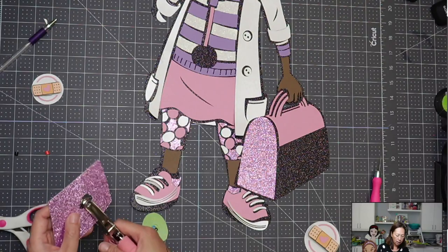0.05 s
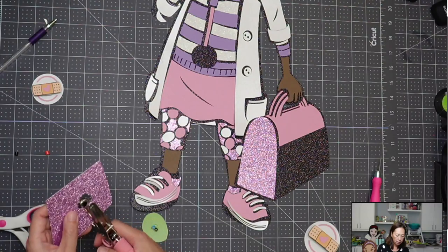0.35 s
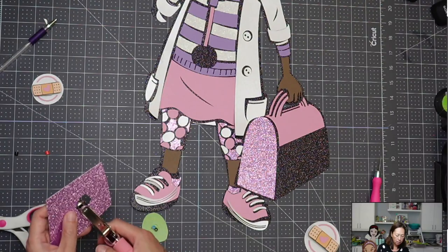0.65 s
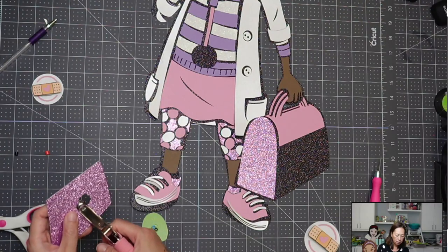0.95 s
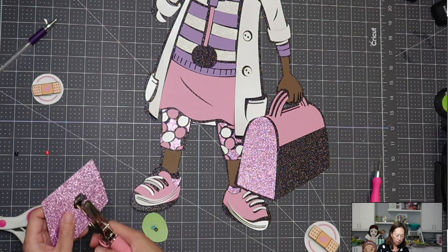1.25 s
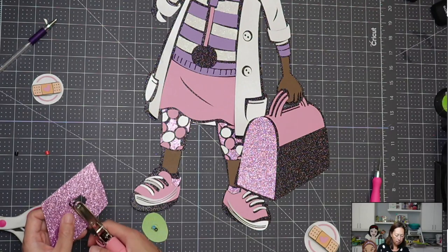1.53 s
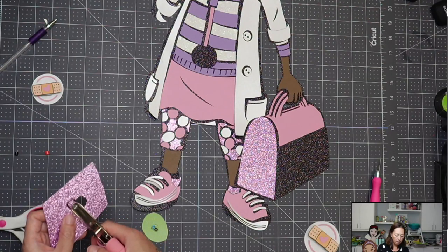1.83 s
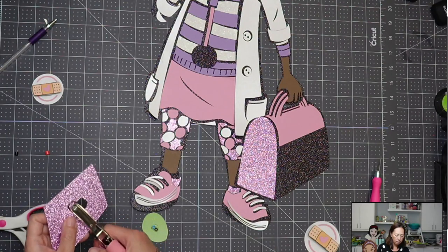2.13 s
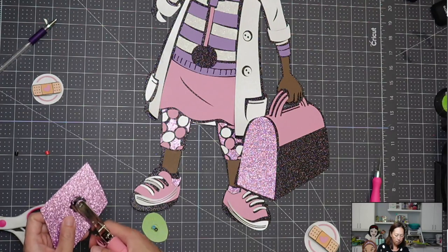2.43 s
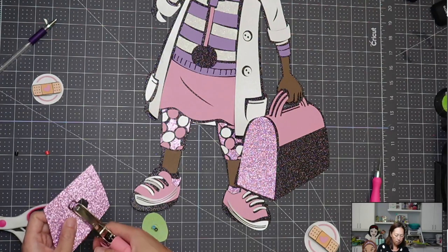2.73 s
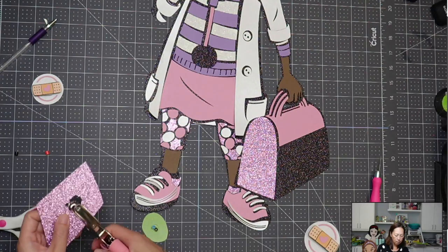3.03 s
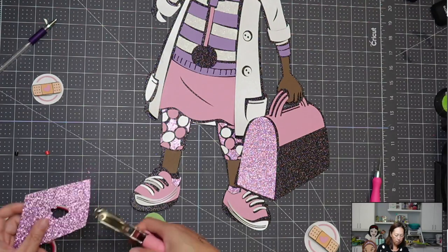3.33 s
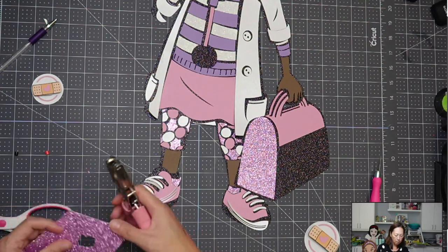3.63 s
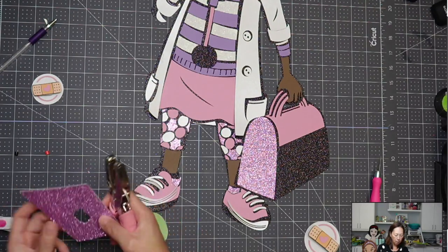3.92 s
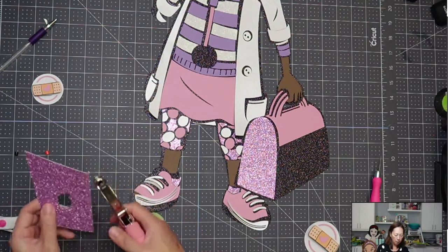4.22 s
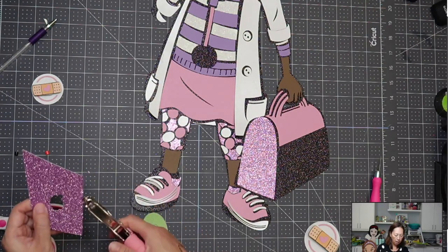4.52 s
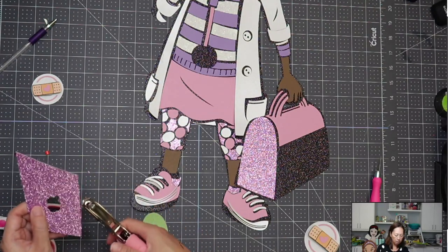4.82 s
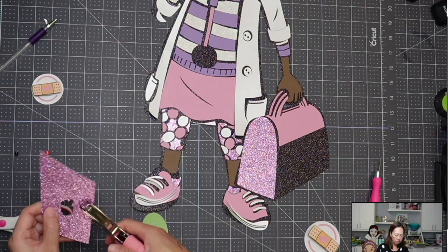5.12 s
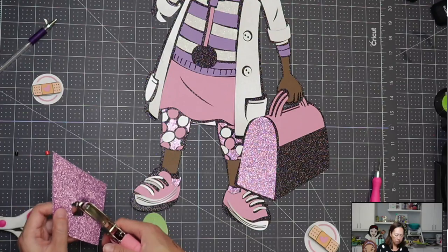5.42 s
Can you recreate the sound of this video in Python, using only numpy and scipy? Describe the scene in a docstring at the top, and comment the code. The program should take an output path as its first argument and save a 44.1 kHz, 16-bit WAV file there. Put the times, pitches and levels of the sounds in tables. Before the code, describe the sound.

In a small room with a faint fan hum, a plier-style hole punch bites through card with two loud metallic snaps that overload the close microphone, each followed by a springy clack. Quieter handling comes next: the card scrapes and creaks out of the jaws, fingers brush its glittery surface, the tool gives a lighter clack, and the card taps softly against the metal. Each click has a short echo.

```python
"""A computer fan hums in a small hard room, where a first snap is just dying away.
A plier-style hole punch snaps twice through glitter cardstock, overloading a close microphone;
after each snap the sprung handles clack open. Near 3 s the card is dragged out of the jaws,
scraping and creaking. Fingertips rub the glitter as it is turned, the punch clacks once more,
and the card ticks back in. The room answers every click."""
import sys
import numpy as np
from scipy import signal
from scipy.fft import rfft, irfft, next_fast_len
from scipy.io import wavfile
from scipy.ndimage import uniform_filter1d, map_coordinates

SR = 44100
rng = np.random.default_rng(int(sys.argv[2]) if len(sys.argv) > 2 else 0)


def dump_mix(stems):
    """Bounce the given channels to the path in sys.argv[1] as a 16-bit WAV at rate SR."""
    frames = np.atleast_2d(stems).T  # one column per channel
    limited = np.clip(frames, -1, 1)  # hard clip at full scale
    pcm = np.round(limited * 32767).astype(np.int16)
    wavfile.write(sys.argv[1], SR, pcm)


N = 249594
LEAD_SAMPLES = SR // 4  # before time zero

# Mains and fan lines. Each row: frequency in Hz, level in dB.
HUM_LINES = [(118.4, -54.5), (199.2, -64.5), (236.9, -65.5), (269.2, -67.5), (301.5, -66.5), (398.4, -68.5),
             (532.9, -74.5)]
# Table and wall echoes. Each row: delay in seconds, relative level in dB.
ECHOES = [(.0031, -11.5), (.0058, -13.5), (.0074, -18), (0.019, -16.5), (0.0196, -13.5), (0.028, -21),
          (0.0345, -19.5)]
# Room decay. Each row: frequency in Hz, t60 in seconds.
ROOM_DECAY = [(150, 0.12), (500, 0.32), (1200, 0.49), (3200, 0.44), (6500, 0.37), (10000, 0.5),
              (15000, 0.22)]

# Noise spectra. Each row: frequency in Hz, relative level in dB.
FAN_SPECTRUM = [(20, -3), (40, 0.5), (70, 7.5), (110, 3), (160, -1), (280, -8.5), (450, -10), (950, -16.5),
                (1300, -16), (1900, -21), (2800, -22.5), (3250, -16.5), (3900, -26.5), (15500, -27)]
HISS_SPECTRUM = [(30, 15.5), (200, 9), (1000, 3.5), (3000, 0.5), (15000, -13.5)]
GLITTER_SPECTRUM = [(200, -22), (1200, -7.5), (2200, -5), (3200, 0), (5200, -5.5), (8000, -12),
                    (15000, -24)]
CARD_SPECTRUM = [(100, -21), (500, -14), (780, 0.5), (1000, -13), (1350, -4), (1700, -4.5), (2300, 0.5),
                 (3200, -2), (3900, -10), (5800, -13), (8200, -20), (10000, -27.5), (15000, -36)]
SCRAPE_SPECTRUM = [(300, -27), (1300, -18), (2300, -24), (2900, -3), (3200, 8.5), (3600, -12.5),
                   (5000, -14), (8000, -32.5), (15000, -43)]
TAP_SPECTRUM = [(200, -14.5), (1000, -10), (2200, -6), (3300, 5.5), (4200, -3.5), (5400, -5), (8000, -12),
                (11000, -21.5), (15000, -30.5)]
CRACK_SPECTRUM = [(100, -11), (400, -6.5), (600, -8), (1000, 2), (1700, -0.5), (2200, -4), (3000, 3.5),
                  (4500, -2), (6200, -0.5), (8500, -11), (12000, -17.5), (16000, -18)]

# Modes of card and punch. Each row: ratio to the part's pitch, relative level in dB, t60 in seconds.
CARD_MODES = [(.61, -3.5, 0.044), (1.0, 3.5, 0.026), (1.42, -1.5, 0.024)]
FRAME_MODES = [(.34, -21.5, .02), (.75, -12, .013), (.89, -6, 0.017), (1.0, 0, .02), (1.09, -2.5, .017),
               (1.39, -8, 0.014)]
LEVER_MODES = [(.91, -3.5, 0.0074), (1.0, 1.5, 0.01), (1.07, -3.5, 0.014), (1.19, -13.5, .013),
               (1.39, -11.5, 0.0095)]
SPRING_MODES = [(.78, -7, 0.0086), (.89, -5, 0.0089), (1.0, -7.5, 0.027), (1.22, -12, .01)]

# Hand strokes. Each row: start in seconds, length in seconds, level in dB.
FINGER_RUBS = [(3.445, 0.019, -51.5), (3.52, 0.025, -50), (3.595, .03, -52), (3.735, .015, -57.5),
               (3.87, .02, -58)]  # fingertips on glitter
CARD_DRAGS = [(1.13, 0.064, -58.5), (2.835, 0.0087, -54), (2.97, 0.14, -49.5), (3.025, .015, -37.5),
              (4.968, 0.017, -55.5)]  # card through the jaws
EDGE_SCRAPES = [(2.985, 0.11, -47.5), (2.999, .009, -40), (4.917, 0.011, -46)]  # card edge along the die
CARD_CREAKS = [(3.0, 0.022, -44)]  # hardest tug

# Card hits the jaws. Each row: start in seconds, relative overall and knock levels in dB,
# contact time in seconds.
CARD_TICKS = [(1.207, -39, -7.5, 0.0073), (1.617, -45.5, 4, 0.0064), (2.723, -47.5, 13, 0.037),
              (2.824, -44, -2.5, .008), (2.954, -32.5, -7.5, .0055), (2.988, -36, -7, .01),
              (3.032, -26.5, -21, 0.015), (3.1438, -27, 1, 0.022), (3.469, -40, -0.5, 0.017),
              (3.794, -38, -20, 0.024), (4.571, -44, 2, 0.019), (4.77, -37, -4.5, 0.0093),
              (4.908, -44, -17.5, .008), (4.966, -46.5, -5, 0.0089)]
# Die, stop and handle contacts. Each row: start in seconds, relative overall and frame levels in dB,
# lever pitch in Hz, relative spring and crack levels in dB, contact time in seconds, room tail in dB.
METAL_CLACKS = [(-.012, -19.5, -7, 3405, 3, 9.5, 0.0044, -5.5),
                (0.9044, -31, -20, 3540, 11, 10, 0.018, -2.5),
                (0.9214, -11.5, -16, 3390, -21, 3, 0.0037, -12),
                (1.6916, -7.5, -8.5, 3170, -14, -4, .003, -6), (1.9106, -18.5, -26, 3560, -2, 3, 0.013, -8),
                (1.9280, -8, -19, 3306, -8.5, -1, 0.0045, -12),
                (4.1104, -26.5, -17, 2980, 0.5, 1, 0.0045, -12.5)]
# Die breaks through. Each row: start in seconds, overall level in dB, frame pitch in Hz and level in dB,
# lever pitch in Hz and level in dB, spring, crack and thump levels in dB. Levels are relative.
PUNCH_SNAPS = [(-.17, 5.5, 1290, -9.5, 2950, -13, 4, 2.5, -11),
               (0.7261, 7, 1280, 1.5, 2955, -5, -3.5, -0.5, -8.5),
               (1.74, 10, 1163, -1.5, 2938, 2.5, -18, -3.5, -28)]


def amp(db):
    """Decibels to gain."""
    return 10 ** (np.asarray(db) / 20)


def unit_rms(x):
    """Scale to rms 1."""
    return x / np.sqrt(np.mean(x ** 2) + 1e-20)


def log_interp(points, hz):
    """Interpolate (Hz, value) points on a log axis."""
    knots_hz, values = np.transpose(points)
    return np.interp(np.log(hz + 1), np.log(knots_hz + 1), values)


def wobble(rate_hz):
    """Smooth random curve, rate_hz knots a second."""
    knots = rng.standard_normal(int(N * rate_hz / SR) + 4)
    return map_coordinates(knots, [np.arange(N) * rate_hz / SR])


def coloured(x, spectrum):
    """Minimum-phase filter of unit energy."""
    size = 2 * next_fast_len(len(x) // 2 + 2048)
    gain = unit_rms(amp(log_interp(spectrum, np.fft.rfftfreq(size, 1 / SR))))
    cepstrum = irfft(np.log(gain))
    cepstrum[1:size // 2] *= 2
    cepstrum[size // 2 + 1:] = 0
    return irfft(rfft(x, size) * np.exp(rfft(cepstrum)))[:len(x)]


def add(track, start_s, sound):
    """Mix into a track that begins LEAD_SAMPLES early."""
    part = track[max(LEAD_SAMPLES + round(start_s * SR), 0):][:len(sound)]
    part += sound[:len(part)]


def background():
    """Fan rush and wavering hum in the centre, faint hiss at the sides."""
    t = np.arange(N) / SR
    rush = amp(-51) * unit_rms(coloured(rng.standard_normal(N), FAN_SPECTRUM))
    hiss = amp(-65) * unit_rms(coloured(rng.standard_normal(N), HISS_SPECTRUM))
    hum = sum(np.sqrt(2) * amp(db + 2 * wobble(5.5)) * np.sin(2 * np.pi * hz * t + 0.92 * wobble(5.5))
              for hz, db in HUM_LINES)
    return np.array([rush + hum + hiss, rush + hum - hiss])


def in_room(x, walls_db, tail_db):
    """Direct sound, table and wall echoes, diffuse tail."""
    hz, t, noise = signal.stft(rng.standard_normal(SR * 3 // 4), SR, nperseg=256)
    swell = 1 - np.exp(-t / 0.013)
    decay = amp(-60 * t / log_interp(ROOM_DECAY, hz)[:, None])
    tail = signal.istft(noise * swell * decay, SR, nperseg=256)[1]
    response = amp(tail_db) * tail / np.linalg.norm(tail)
    response[0] += 1
    for delay_s, db in ECHOES:
        moved_s = abs(delay_s + rng.normal(0, 0.0002))  # the hand shifts
        response[round(moved_s * SR)] += amp(db + walls_db)
    return signal.fftconvolve(x, response)


def strokes(rows, rise_s, fall_s):
    """Hand stroke envelope: swell, hold, fade; 20 dB per rise or fall time."""
    t = np.arange(N) / SR
    power = np.zeros(N)
    for start_s, length_s, db in rows:
        early_s = np.maximum(start_s - t, 0)
        late_s = np.maximum(t - start_s - length_s, 0)
        power += amp(db - 20 * early_s / rise_s - 20 * late_s / fall_s) ** 2
    return np.sqrt(power)


def friction(envelope, spectrum, rate_hz, spread_db, hiss_gain, flutter_db):
    """Glitter flakes catch and slip: uneven clicks over fine hiss."""
    slips = (rng.random(N) < rate_hz / SR) * amp(spread_db * rng.standard_normal(N))
    slips *= rng.choice([-1, 1], N)
    grains = unit_rms(coloured(unit_rms(slips) + hiss_gain * rng.standard_normal(N), spectrum))
    # the contact point wanders, so resonances come and go
    bins = signal.stft(grains, nperseg=512)[2]
    patches = uniform_filter1d(rng.standard_normal(bins.shape), size=5, axis=0)
    patches = unit_rms(uniform_filter1d(patches, size=6, axis=1))
    shifting = unit_rms(signal.istft(bins * amp(3.5 * patches), nperseg=512)[1][:N])
    flutter = amp(flutter_db * wobble(70))
    return in_room(shifting * envelope * flutter, walls_db=-3, tail_db=-13)[:N]


def creak():
    """Nearly regular slips, each flicking the card."""
    slip_hz = 747 * (1 + 0.016 * wobble(250))
    slips = np.diff(np.floor(np.cumsum(slip_hz) / SR), prepend=0) * amp(2.4 * wobble(400))
    voice = unit_rms(coloured(slips - slips.mean(), CARD_SPECTRUM))
    envelope = strokes(CARD_CREAKS, rise_s=0.032, fall_s=0.09)
    return in_room(voice * envelope, walls_db=-6, tail_db=-10.5)[:N]


def ring(modes, pitch_hz, t):
    """Hand-damped modes; strengths vary per blow."""
    sound = np.zeros(len(t))
    for k, (ratio, db, t60_s) in enumerate(modes):
        envelope = amp(db + rng.normal(0, 1) - 60 * t / t60_s)
        sound += (-1) ** k * envelope * np.sin(2 * np.pi * pitch_hz * ratio * t)
    return sound


def burst(spectrum, decay_s, t):
    """Decaying noise, whitened, damped again, then coloured."""
    noise = rng.standard_normal(len(t)) * amp(-60 * t / decay_s)
    white = irfft(np.exp(1j * np.angle(rfft(noise))), len(t))
    return coloured(white * amp(-20 * t / decay_s) * np.linalg.norm(noise), spectrum)


def ticks():
    """The card's edge taps the jaws; the stiff sheet knocks hollowly."""
    track, t = np.zeros(LEAD_SAMPLES + N), np.arange(SR // 10) / SR
    for start_s, db, knock_db, contact_s in CARD_TICKS:
        tap = burst(TAP_SPECTRUM, 2 * contact_s, t)
        knock = amp(knock_db - 6.5) * ring(CARD_MODES, pitch_hz=1281, t=t)
        onset = 1 - np.exp(-t / (0.08 * contact_s))  # paper gives against steel
        add(track, start_s, amp(db) * in_room(onset * (tap + knock), walls_db=-4.5, tail_db=-10.5))
    return track[LEAD_SAMPLES:]


def clacks():
    """The die seats and pulls free; the spring throws the handles to their stop."""
    track, t = np.zeros(LEAD_SAMPLES + N), np.arange(SR // 10) / SR
    for start_s, db, frame_db, lever_hz, spring_db, crack_db, contact_s, tail_db in METAL_CLACKS:
        frame = amp(frame_db) * ring(FRAME_MODES, pitch_hz=1146, t=t)
        lever = ring(LEVER_MODES, lever_hz, t)
        spring = amp(spring_db) * ring(SPRING_MODES, pitch_hz=5880, t=t)
        crack = amp(crack_db - 0.5) * burst(CRACK_SPECTRUM, 2 * contact_s, t)
        onset = 1 - np.exp(-t / (0.048 * contact_s))  # contact force builds
        clack = onset * (frame + lever + spring + crack)
        add(track, start_s, amp(db + 0.5) * in_room(clack, walls_db=-2, tail_db=tail_db))
    return track[LEAD_SAMPLES:]


def snaps():
    """The card gives way, the die slams home, the tool rings and kicks."""
    track, t = np.zeros(LEAD_SAMPLES + N), np.arange(SR // 10) / SR
    squeezed_t60_s, thump_s = 0.0097, 0.00058
    for start_s, db, frame_hz, frame_db, lever_hz, lever_db, spring_db, crack_db, thump_db in PUNCH_SNAPS:
        frame = amp(frame_db) * ring(FRAME_MODES, frame_hz, t)
        lever = amp(lever_db) * ring(LEVER_MODES, lever_hz, t)
        spring = amp(spring_db) * ring(SPRING_MODES, pitch_hz=5937, t=t)
        spring *= amp(-60 * t / squeezed_t60_s)  # extra damping when squeezed tight
        crack = amp(crack_db - 2) * burst(CRACK_SPECTRUM, decay_s=0.019, t=t)
        thump = amp(thump_db) * (1 - t / thump_s) * np.exp(-t / thump_s)
        snap = frame + lever + spring + crack + thump
        add(track, start_s, amp(db - 1.5) * in_room(snap, walls_db=2, tail_db=-8.5))
    return track[LEAD_SAMPLES:]


def scene():
    """Punch and card centred, over the fan."""
    drag = friction(strokes(CARD_DRAGS, rise_s=0.036, fall_s=0.045), CARD_SPECTRUM,
                    rate_hz=1000, spread_db=2.5, hiss_gain=0.94, flutter_db=2.4)
    scrape = friction(strokes(EDGE_SCRAPES, rise_s=0.012, fall_s=0.06), SCRAPE_SPECTRUM,
                      rate_hz=550, spread_db=1, hiss_gain=0.3, flutter_db=4.7)
    rub = friction(strokes(FINGER_RUBS, rise_s=0.14, fall_s=0.097), GLITTER_SPECTRUM,
                   rate_hz=1100, spread_db=2, hiss_gain=0.56, flutter_db=0)
    return snaps() + clacks() + ticks() + drag + scrape + creak() + rub + background()


def record(dry):
    """Hard clip at full scale, then a steep 16 kHz low-pass."""
    clipped = np.clip(dry, -1, 1)
    lowpass = signal.firwin(129, 16000, fs=SR)
    return signal.fftconvolve(clipped, lowpass[None], mode="same", axes=1)


dry = scene()
out = record(dry)
dump_mix(out)
```